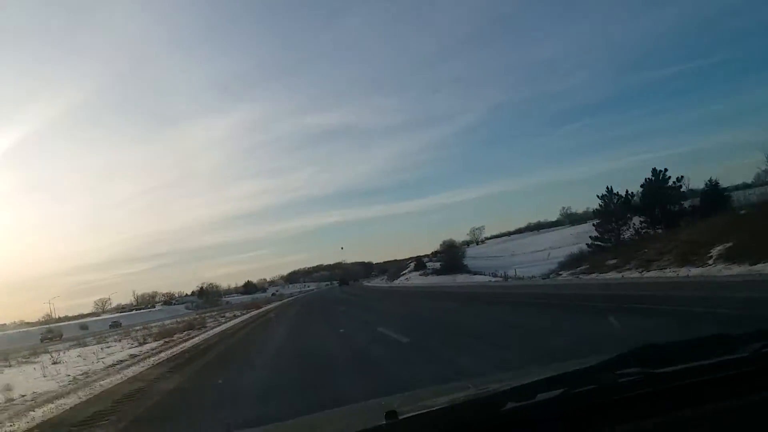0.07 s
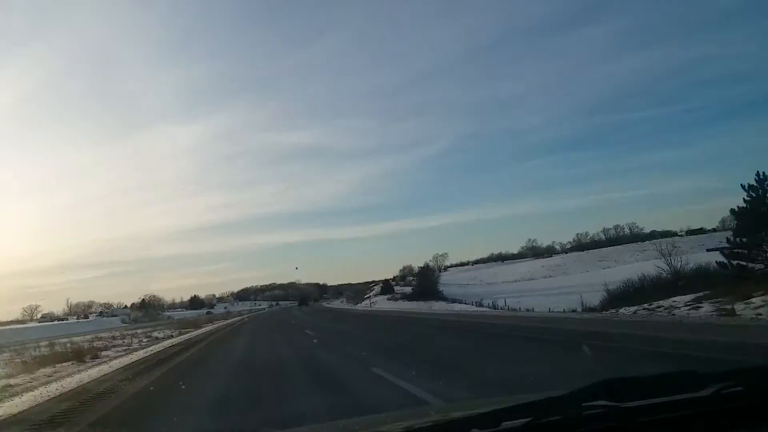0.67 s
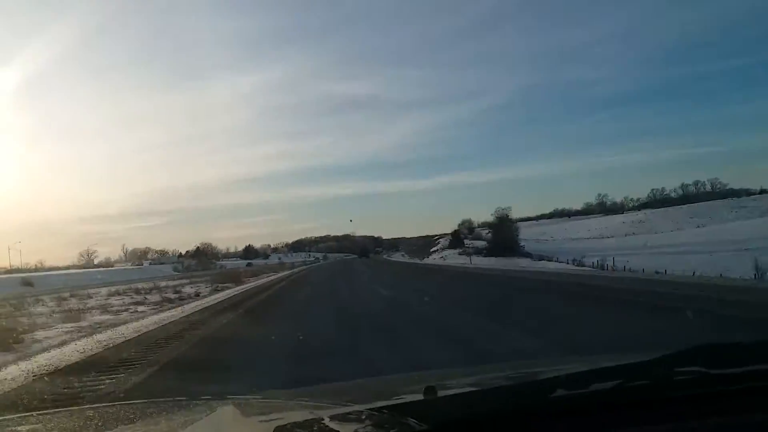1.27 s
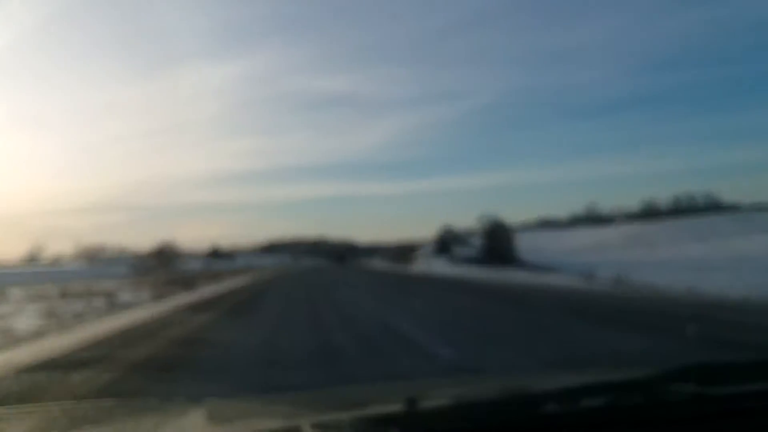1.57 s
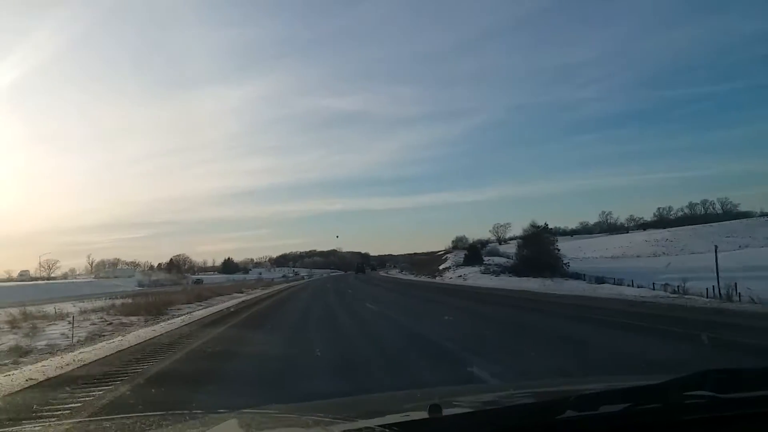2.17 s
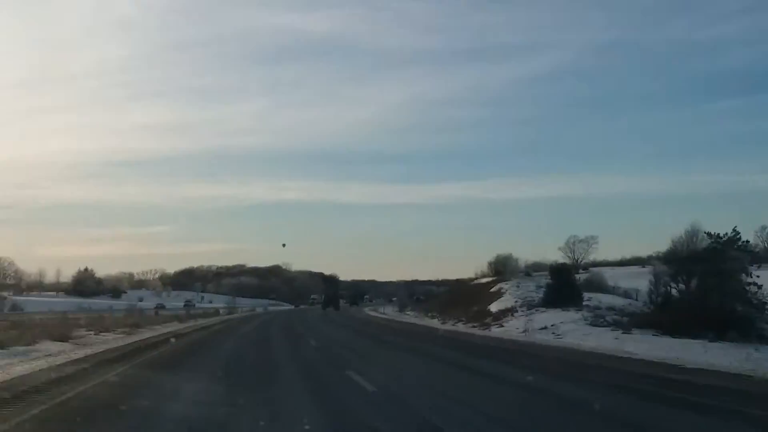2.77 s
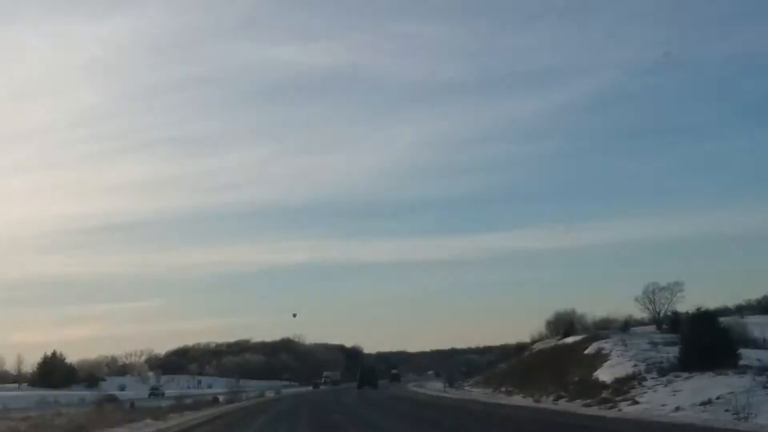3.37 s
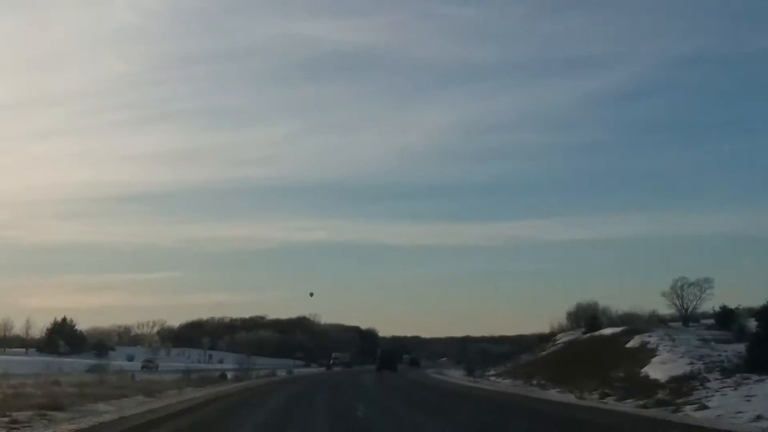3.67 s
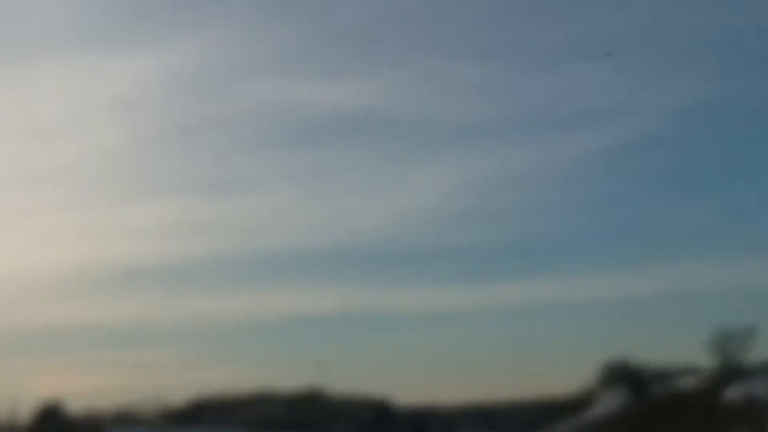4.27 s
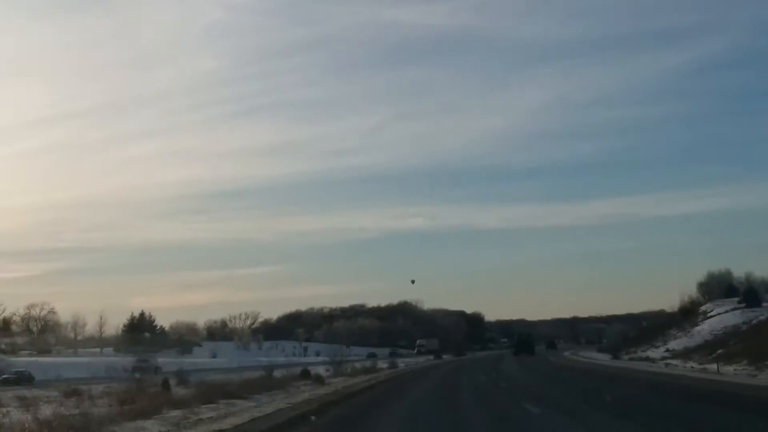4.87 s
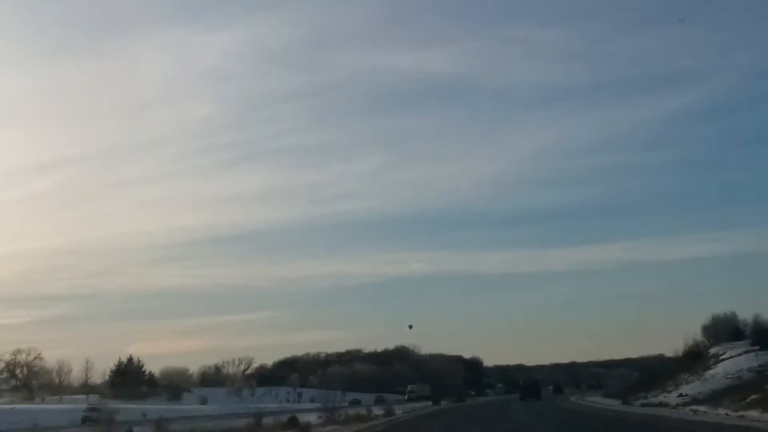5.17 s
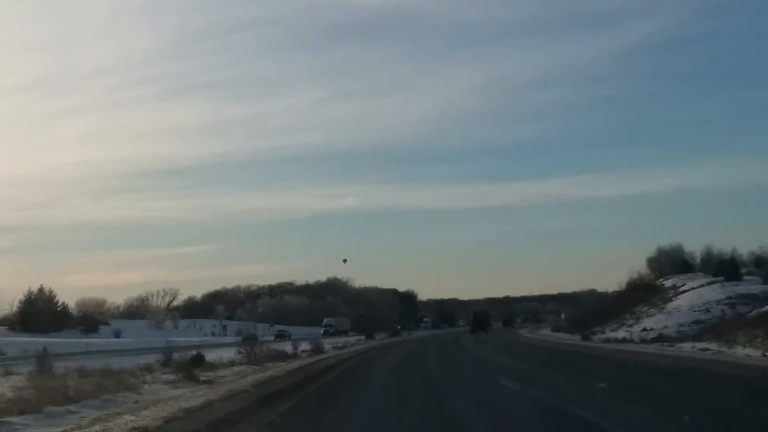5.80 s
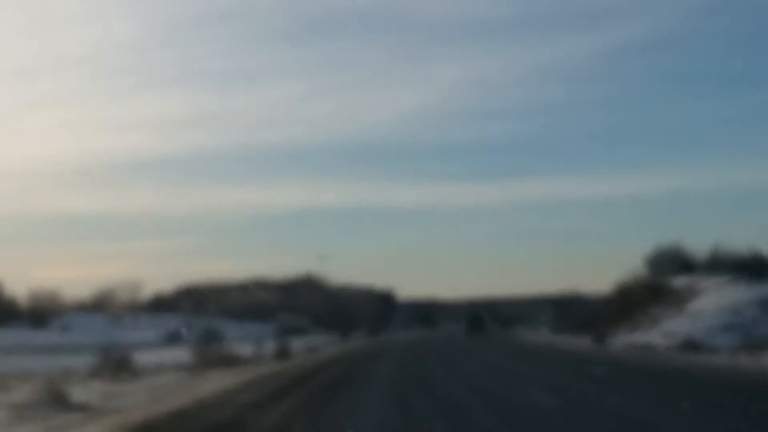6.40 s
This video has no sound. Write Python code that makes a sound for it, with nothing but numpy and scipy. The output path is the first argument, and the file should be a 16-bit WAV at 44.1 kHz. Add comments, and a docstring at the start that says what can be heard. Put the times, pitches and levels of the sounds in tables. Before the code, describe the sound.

Steady road rumble, engine hum and tyre roar inside a car at highway speed, with two thumps over bumps.

```python
"""Car interior at highway speed

Hand-held camera behind the windscreen, stereo from its two microphone ports. Road texture drums the
cabin's resonances over the engine's hum, tyres and airflow roar beyond the glass, and the axles thump
over two bumps, rattling loose trim. The noise narrows as the camera is turned. Right at the microphone,
fingers tick and rub faintly on the case, and the electronics add a thin hiss and whine."""
import sys
import numpy as np
from scipy import signal
from scipy.fft import rfft, irfft, next_fast_len
from scipy.io import wavfile
from scipy.ndimage import uniform_filter1d, map_coordinates

SR = 44100
rng = np.random.default_rng(int(sys.argv[2]) if len(sys.argv) > 2 else 0)


def materialize(psi):
    """Save the field psi as 16-bit PCM at rate SR to the path in sys.argv[1].

    A 1-D psi becomes a single channel; in a 2-D psi each row is a channel.
    """
    bounded = np.clip(np.atleast_2d(psi).T, -1, 1)
    quanta = np.round(bounded * 32767).astype(np.int16)
    wavfile.write(sys.argv[1], SR, quanta)


N = 288414

# the front wheels meet a bump: t/s, thud/dB, tyre slap/dB, floor panel/dB, body heave/dB
BUMPS = [(3.079, -10.5, -21, -15, -16), (4.031, -15.5, -34, -24.5, -16.5)]
AXLE_LAG_S = 0.067  # the rear wheels follow after wheelbase over speed
TURN_AT_S, TURN_TAKES_S = 2.65, 0.35  # the camera is turned in the hand


def amp(db):
    """Decibels to gain."""
    return 10 ** (np.asarray(db) / 20)


def unit(x):
    """Scale to rms 1."""
    return x / np.sqrt(np.mean(x ** 2) + 1e-20)


def along(points, hz):
    """Read (f/Hz, value) points on a log frequency axis."""
    freqs, values = np.transpose(points)
    return np.interp(np.log(hz + 1), np.log(freqs + 1), values)


def curve(points):
    """Join (t/s, value) points into one value per sample."""
    times, values = np.transpose(points)
    return np.interp(np.arange(N) / SR, times, values)


def wobble(rate):
    """A smooth random curve, rate knots a second."""
    knots = rng.standard_normal(int(N * rate / SR) + 4)
    return map_coordinates(knots, [np.arange(N) * rate / SR])


def ramp(at_s, takes_s):
    """A ramp from 0 to 1, centred on a moment."""
    return np.clip((np.arange(N) / SR - at_s) / takes_s + 0.5, 0, 1)


def swell(start_s, length_s, order=1):
    """An envelope that rises to 1 in half its length and dies away; a higher order is more compact."""
    age = np.maximum(np.arange(N) / SR - start_s, 0) / (length_s / 2)
    return (age * np.exp(1 - age)) ** order


def even(x, span_s):
    """Hold a noise's strength steady over stretches longer than the span."""
    power = uniform_filter1d(np.mean(x ** 2, axis=0), max(int(span_s * SR), 1))
    return x / np.sqrt(np.abs(power) + 1e-9)


def widen(x, width_db):
    """Scale the difference between left and right."""
    mid = x.mean(axis=0)
    return mid + amp(width_db) * (x - mid)


def add(out, start_s, sound):
    """Mix a short stereo sound in at a time."""
    part = out[:, round(start_s * SR):][:, :sound.shape[1]]
    part += sound[:, :part.shape[1]]


def cabin_noise(gain):
    """Stereo noise of rms 1, shaped by gain(hz): long waves reach both ports alike, short ones do not."""
    # likeness of the two ports: f/Hz, correlation
    correlation = [(35, .997), (100, 0.98), (170, 1), (340, 0.85), (500, 0.86), (660, 0.21), (850, 0.43),
                   (1050, -0.12), (1600, -0.21), (1950, 0.43), (3000, 0.3), (7000, 0.15), (14000, 0.53)]
    # balance between the ports: f/Hz, left minus right/dB
    balance = [(100, 0), (180, 1), (620, 0.5), (850, 1), (1600, -3.5), (2900, 1.5), (3900, 0), (5400, -4.5),
               (6500, 1.5), (8500, 2), (13000, 0.5)]
    # lead of the left port: f/Hz, phase/rad
    left_lead = [(120, 0.042), (280, 0.087), (520, 0.073), (860, 0.13), (960, 0.58), (1050, 0.04)]
    size = next_fast_len(N + 8192)
    hz = np.fft.rfftfreq(size, 1 / SR)
    spread = np.arccos(np.clip(along(correlation, hz), -0.999, 0.999)) / 2
    mid, side = rfft(rng.standard_normal((2, size))) * gain(hz) * [np.cos(spread), np.sin(spread)]
    lean = amp(along(balance, hz) / 2) * np.exp(1j * along(left_lead, hz) / 2)
    return unit(irfft([(mid + side) * lean, (mid - side) / lean], size)[:, :N])


def rush(spectrum):
    """Cabin noise with a (f/Hz, level/dB) spectrum, cut steeply an octave above its last point."""
    cutoff_hz = 2 * spectrum[-1][0]
    return cabin_noise(lambda hz: amp(along(spectrum, hz)) / (1 + (hz / cutoff_hz) ** 10))


def ring(centre_hz, width_hz):
    """A resonance kept ringing by random shaking."""
    return cabin_noise(lambda hz: 1 / (1 + ((hz - centre_hz) / width_hz) ** 2))


def tick(centre_hz, octaves, t60_s, order=3):
    """A sharp strike and its short stereo ring in one band, with peak 1."""
    t = np.arange(8192) / SR
    edges_hz = centre_hz * 2 ** (np.array([-octaves, octaves]) / 2)
    edges_hz = np.minimum(edges_hz, [SR / 2 - 2000, SR / 2 - 1000])
    band = signal.butter(order, edges_hz, "bandpass", fs=SR, output="sos")
    strike = 6 * (t == 0)
    slip = strike + rng.standard_normal(len(t)) + 0.21 * rng.standard_normal((2, len(t)))
    burst = signal.sosfilt(band, slip * amp(-60 * t / t60_s))
    return burst / np.abs(burst).max(axis=1, keepdims=True)


def surge_db():
    """How far the road noise stands above its average as the asphalt and the camera's aim change."""
    # road noise at the microphone: t/s, level/dB
    strength = [(0.1, -31.5), (0.46, -31), (0.69, -31.5), (2.51, -31), (2.75, -30), (4.38, -29.5),
                (5.52, -31), (6.5, -29.5)]
    strength_db = curve(strength)
    return strength_db - strength_db.mean()


def road():
    """Asphalt texture shakes the body and the cabin's resonances; uneven patches make the boom throb."""
    # road vibration through the body: f/Hz, level/dB
    body_spectrum = [(11, -48.5), (20, -20), (32, -9), (42, -8), (52, -6.5), (64, -2.5), (80, -2), (105, 0),
                     (135, 0), (160, -2.5), (190, -3.5), (232, -6.5), (280, -8.5), (315, -10), (429, -14.5),
                     (523, -16.5), (629, -27), (700, -30.5), (910, -60.5), (1540, -120)]
    # narrow cabin and tyre resonances: f/Hz, width/Hz, level/dB
    resonances = [(118, 13, -27), (416, 53, -37.5)]
    # uneven patches of road: t/s, level/dB
    patches = [(2.69, -15), (3.22, -12), (3.44, -16), (3.515, -21), (5.53, -18.5)]
    body = amp(-19) * rush(body_spectrum)
    booms = sum(amp(db) * ring(hz, width) for hz, width, db in resonances)
    rumble = amp(-16 + 0.89 * surge_db() + 0.16 * wobble(7.1)) * even(body + booms, span_s=0.24)
    throb = sum(amp(db) * swell(s, length_s=0.069) for s, db in patches)
    return rumble + throb * even(ring(centre_hz=113.5, width_hz=7.7), span_s=0.014)


def engine(firing_hz=89.7, sag_hz_per_s=0.045, waver_db=2.5):
    """Clean firing tones, sagging slightly in pitch; they swell together and the upper ones waver."""
    # the firing tone in the cabin: t/s, level/dB
    hum = [(0, -33), (0.7, -30.5), (1.15, -23), (1.8, -26.5), (2.85, -27), (3.3, -30), (5.7, -27),
           (6.2, -20), (6.5, -25.5)]
    # second and third harmonic, relative to the first: level/dB
    overtones_db = [-11.5, -10]
    t = np.arange(N) / SR
    cycles = np.cumsum(firing_hz - sag_hz_per_s * t + 0.1 * wobble(2.97)) / SR
    tone = lambda k: np.sqrt(2) * np.sin(2 * np.pi * (k * cycles + rng.random()))
    overtones = sum(amp(db + waver_db * wobble(2.8)) * tone(k) for k, db in enumerate(overtones_db, 2))
    return amp(curve(hum)) * (tone(1) + overtones)


def tyres_and_air():
    """A broad roar with singing bands; once turned, the microphone catches air over the windscreen."""
    # tyres and airflow through the glass: f/Hz, level/dB
    roar_spectrum = [(350, -23), (560, -2), (760, 2), (1000, -3.5), (1300, -2), (1750, -7), (1980, -7),
                     (2280, -12), (2550, -13), (2900, -15.5), (3200, -18.5), (3480, -24), (4100, -23.5),
                     (5000, -29.5), (8000, -35), (9500, -46.5), (12000, -66)]
    # narrow bands that sing in the roar: f/Hz, width/Hz, level/dB
    singing_bands = [(860, 23, -10.5), (1110, 29, -17), (1245, 22, -14), (1432, 23, -21.5), (1561, 18, -15),
                     (1958, 61, -22.5)]
    roar = amp(1.47 + 0.43 * wobble(15)) * rush(roar_spectrum)
    singing = sum(amp(db + 1.4 * wobble(6.3)) * ring(hz, width) for hz, width, db in singing_bands)
    windscreen = amp(-12) * ramp(TURN_AT_S, TURN_TAKES_S) * ring(centre_hz=1730, width_hz=360)
    return amp(-32.5 + 0.94 * surge_db()) * (roar + singing + windscreen)


def electronics(whine_hz=14000, on_s=0.5, off_s=4.84, fade_s=0.04):
    """The camera's circuits whine faintly for a while; their hiss rises with that and the road noise."""
    # thin hiss of the circuits: f/Hz, level/dB
    hiss_spectrum = [(6000, -28.5), (10000, -5.5), (12000, -0.5), (14000, 1.5), (15700, -4.5)]
    running = ramp(on_s, fade_s) - ramp(off_s, fade_s)
    tone = unit(np.sin(2 * np.pi * whine_hz * np.arange(N) / SR))
    whine = amp(-77.5 + 2.2 * wobble(60)) * running * tone
    hiss = amp(-67.5 + 0.7 * surge_db() + 1.5 * running) * rush(hiss_spectrum)
    return whine + hiss


def plastic_ticks():
    """The case slips under the fingers: each slip is a broad click with a thin snap above it."""
    # slips of the plastic: t/s, click/dB, click f/Hz, snap/dB, t60/s, left minus right/dB
    slips = [(.221, -38, 4500, -42, 0.01, -6.5), (.242, -37, 5800, -64.5, .01, 4),
             (.277, -30, 3600, -45, .015, 3.5), (0.305, -38, 3600, -44.5, .022, 5.5),
             (.316, -40, 4500, -45, 0.018, 4), (1.3265, -22.5, 3170, -56, 0.0014, 3.5),
             (3.281, -49, 4530, -45.5, 0.013, -4), (3.4416, -39.5, 5000, -34.5, 0.009, -7),
             (6.467, -48, 4500, -41, .016, -5.5)]
    out = np.zeros((2, N))
    for s, click_db, click_hz, snap_db, t60_s, pan_db in slips:
        click = amp(click_db) * tick(click_hz, octaves=1.3, t60_s=t60_s)
        snap = amp(snap_db) * tick(centre_hz=13900, octaves=0.2, t60_s=t60_s, order=2)
        pan = amp([[pan_db / 2], [-pan_db / 2]])
        add(out, s, pan * (click + snap))
    return out


def finger_rubs():
    """Skin slides over the case in soft, uneven strokes, right by the microphone."""
    # finger strokes: t/s, level/dB, length/s
    strokes = [(0.256, -54.5, 0.05), (0.298, -54.5, .016), (0.525, -58.5, .04), (0.63, -60.5, .04),
               (3.89, -58, 0.11)]
    # skin rubbing on plastic: f/Hz, level/dB
    skin_spectrum = [(1500, -25), (3500, 4), (7500, -3.5), (10000, -9.5), (14000, -2), (15700, -6)]
    pressure = sum(amp(db) * swell(s, length_s) for s, db, length_s in strokes)
    return pressure * amp(3.3 * wobble(200)) * rush(skin_spectrum)


def bumps(crunch_db=3, rear_thud_db=1, rear_slap_db=-14):
    """At each axle the tyres slap and the suspension thuds; the rear also jolts floor panel and body."""
    # the suspension's thud: f/Hz, level/dB
    thud_spectrum = [(15, -5), (30, 8), (55, -4.5), (85, -2.5), (120, 10), (170, 5.5), (215, -5),
                     (320, -3.5), (400, -13), (700, -34)]
    # the tyre's slap: f/Hz, level/dB
    slap_spectrum = [(300, -4), (750, 6), (1400, 1), (2100, -8), (2700, -22.5), (4000, -30), (9000, -51)]
    thud = widen(even(rush(thud_spectrum), span_s=0.019), width_db=-1.5)
    slap = even(rush(slap_spectrum), span_s=0.01) * unit(amp(crunch_db * wobble(350)))
    panel = even(ring(centre_hz=250, width_hz=48), span_s=0.013)  # the floor's dull knock
    heave = even(ring(centre_hz=34, width_hz=4.5), span_s=0.022)  # the body on its springs
    out = np.zeros((2, N))
    for front_s, thud_db, slap_db, panel_db, heave_db in BUMPS:
        rear_s = front_s + AXLE_LAG_S
        front = amp(thud_db) * thud + amp(slap_db) * slap
        rear = amp(thud_db + rear_thud_db) * thud + amp(slap_db + rear_slap_db) * slap
        body = amp(panel_db) * panel + amp(heave_db) * heave
        out += swell(front_s, length_s=0.044, order=2) * front
        out += swell(rear_s, length_s=0.058, order=2) * rear
        out += swell(rear_s, length_s=0.082, order=4) * body
    return out


def trim_rattle(delay_s=0.032, gap_s=0.039, over_slap_db=1.5, loss_db=2.5):
    """The rear axle's jolt makes loose trim jump and fall back, louder after a harder tyre slap."""
    out = np.zeros((2, N))
    for front_s, _, slap_db, _, _ in BUMPS:
        for k in range(2):
            knock = tick(centre_hz=1670, octaves=1.47, t60_s=0.038)
            knock_db = slap_db + over_slap_db - k * loss_db
            add(out, front_s + AXLE_LAG_S + delay_s + k * gap_s, amp(knock_db) * knock)
    return out


def scene(width_before_db=2.5, width_after_db=-2):
    """The cabin from behind the windscreen; the steady noise narrows in stereo as the camera turns."""
    width_db = width_before_db + (width_after_db - width_before_db) * ramp(TURN_AT_S, TURN_TAKES_S)
    steady = widen(road() + engine() + tyres_and_air() + electronics(), width_db)
    return steady + bumps() + trim_rattle() + plastic_ticks() + finger_rubs()


def record(dry):
    """The camera rounds off peaks near full scale and keeps nothing above its band limit."""
    ceiling, top_hz = 0.99, 15800
    rounded = dry / (1 + np.abs(dry / ceiling) ** 10) ** (1 / 10)
    size = next_fast_len(N + SR // 2)
    passband = np.fft.rfftfreq(size, 1 / SR) < top_hz
    return irfft(rfft(rounded, size) * passband, size)[:, :N]


dry = scene()
out = record(dry)
materialize(out)
```